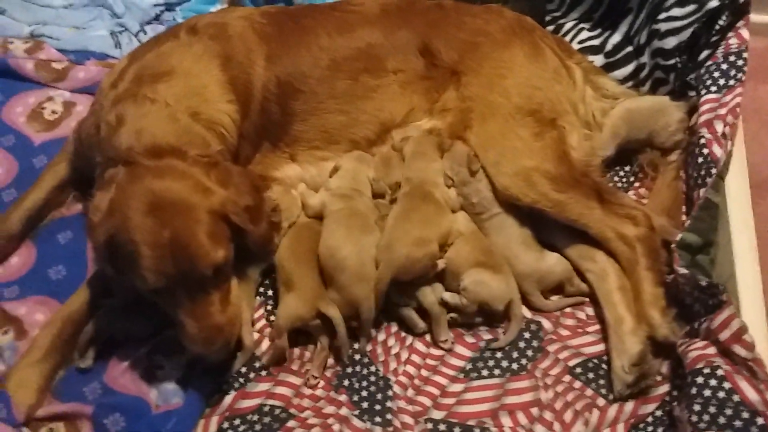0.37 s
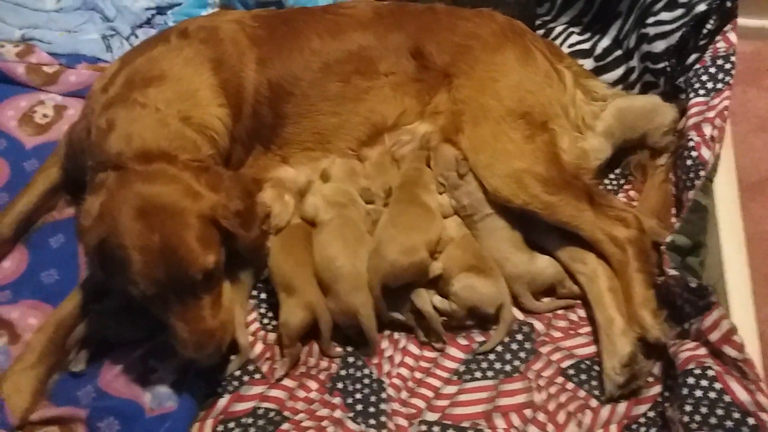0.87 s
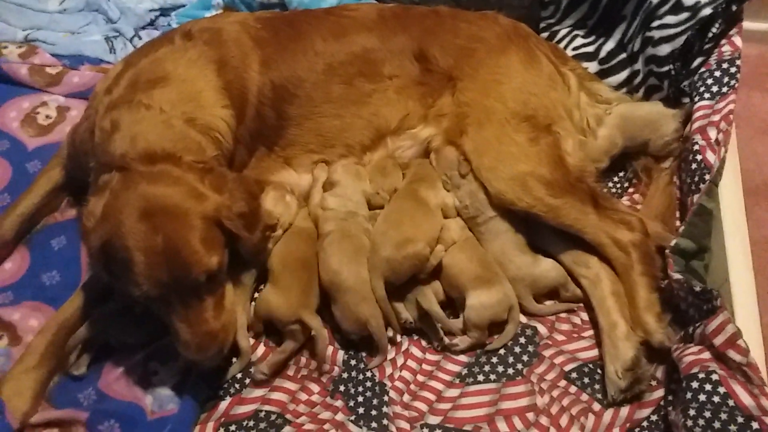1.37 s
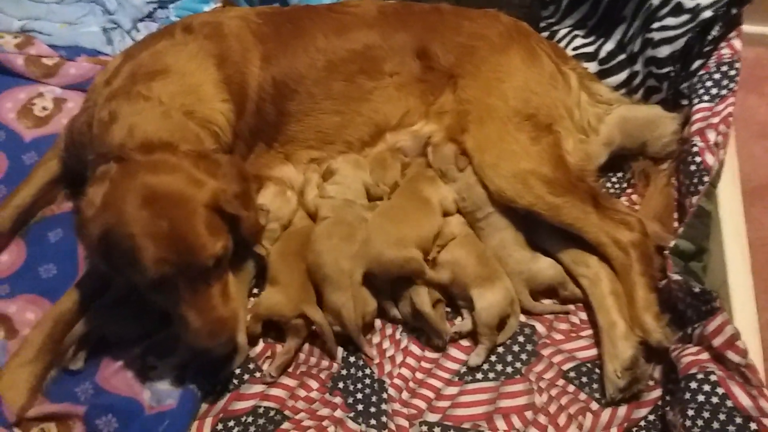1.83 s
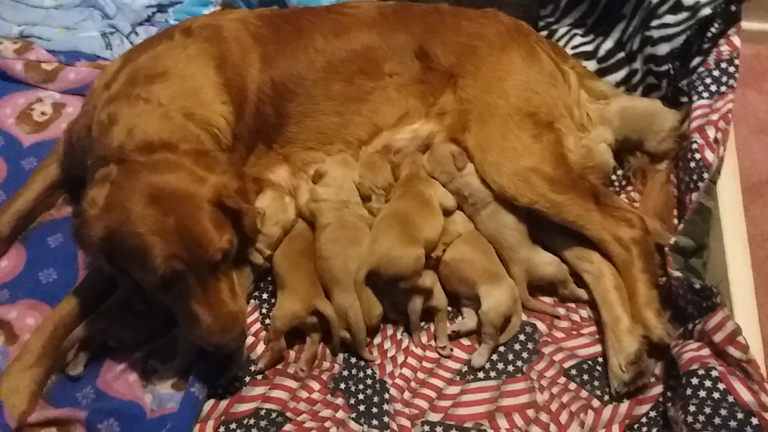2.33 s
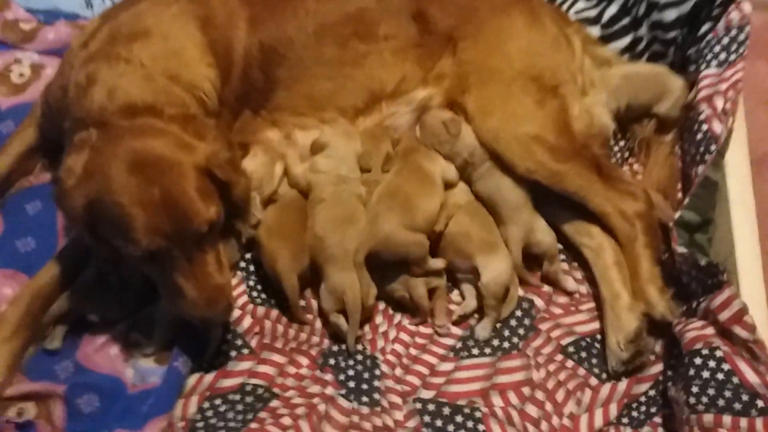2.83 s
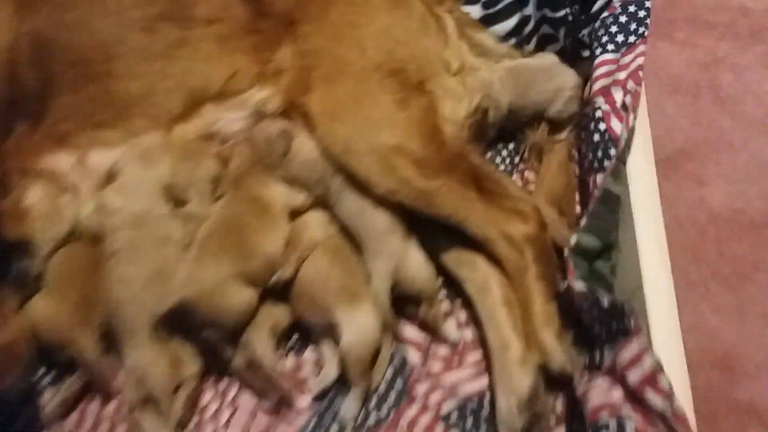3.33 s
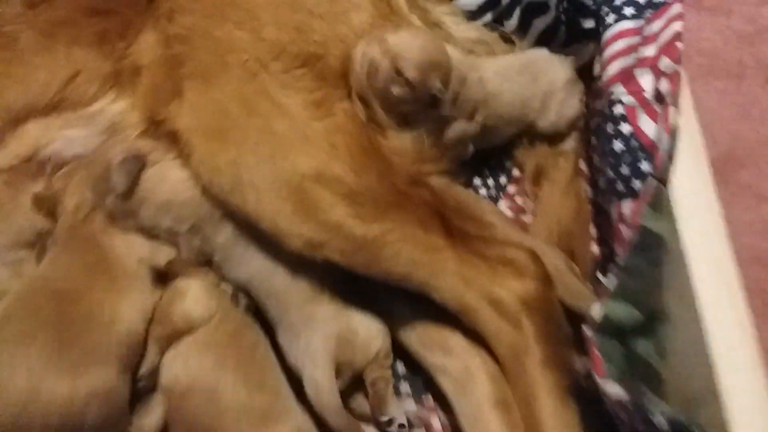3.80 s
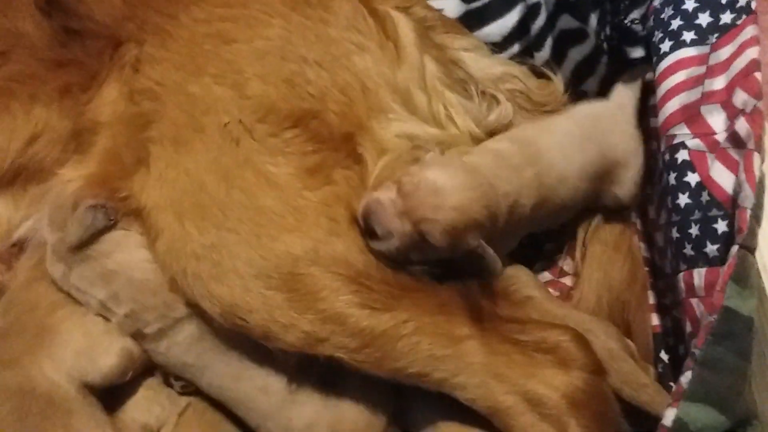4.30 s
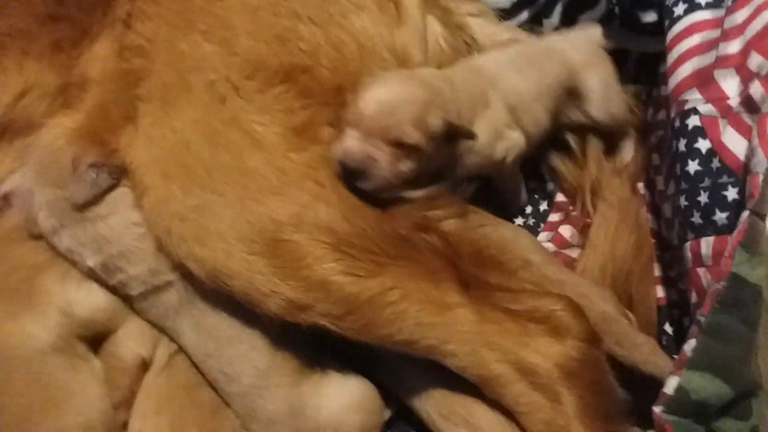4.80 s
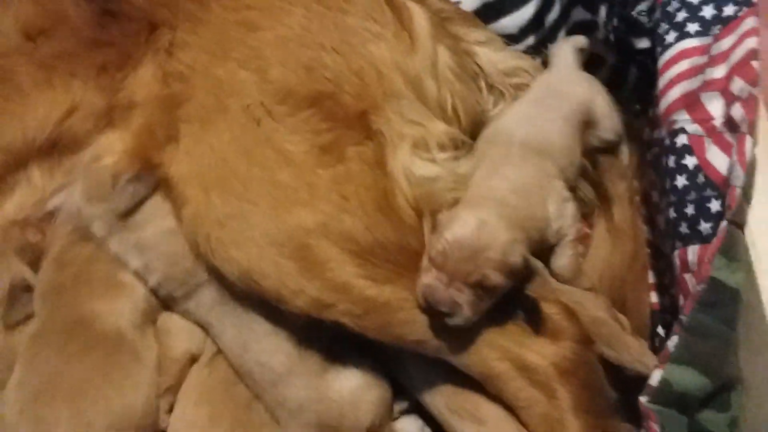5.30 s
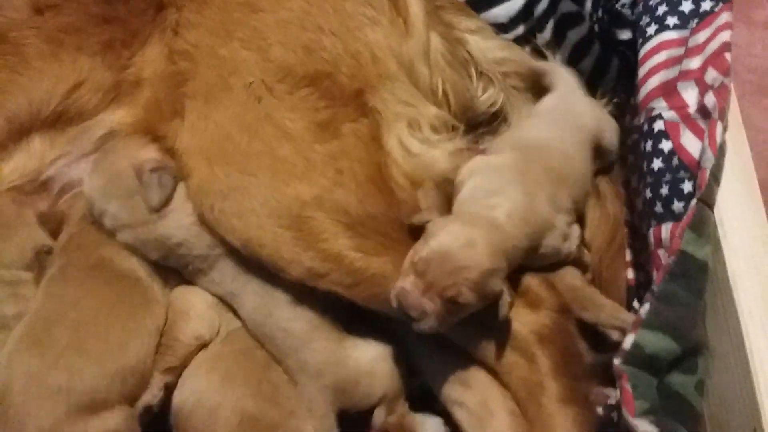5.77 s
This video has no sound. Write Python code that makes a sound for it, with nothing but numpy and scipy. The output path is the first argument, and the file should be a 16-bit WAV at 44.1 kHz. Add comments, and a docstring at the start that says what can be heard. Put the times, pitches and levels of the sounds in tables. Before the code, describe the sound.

A clear puppy whine is already under way at the start, then a longer one leaps up high and slowly sags into a low catch. After small grunts and snuffles comes a short whimper and a loud, sharp squeal, then wet suckling smacks, faint grunts and the mother's soft panting. Close stereo microphone in a quiet, hissy, small home room.

```python
"""A newborn puppy whines at once, over a mother's soft panting and quiet room hiss; squeals follow.
Whines and squeals are stacks of partials shaped by an opening mouth; panting and hiss are shaped noise.
Humming grunts, some of them low catches that end a cry, a handling thump and puffs of snuffling,
faint whimpers and a few wet suckling smacks come in between.
The puppies get a short room tail, and two close microphone ports give the stereo picture."""
import sys
import numpy as np
from scipy import signal
from scipy.fft import rfft, irfft
from scipy.io import wavfile
from scipy.ndimage import uniform_filter1d

SR = 44100
rng = np.random.default_rng(int(sys.argv[2]) if len(sys.argv) > 2 else 0)


def to_wav(s):
    """Save 16-bit WAV."""
    ch = np.atleast_2d(s).T  # columns
    pcm = np.round(np.clip(ch, -1, 1) * 32767)  # PCM
    wavfile.write(sys.argv[1], SR, pcm.astype(np.int16))


def invert_db(x):
    """Field ratio 10**(x/20) for x, a level in decibels (scalar or array-like)."""
    u = np.asarray(x, float) / 20
    return 10 ** u


N = 260190  # length in samples
# noise is built in frames 128 samples apart, each holding 257 frequency bins
FRAMES, BINS = N // 128 + 5, np.fft.rfftfreq(512, 1 / SR)
TIMES = np.arange(FRAMES) * 128 / SR

# Throat and nose colour of the pup that whines, used in the cry voices. Each row: frequency in Hz, gain in dB.
WHINER = [(600, -1.2), (2600, -5.1), (3200, -19), (3900, -4), (4500, -17.5), (5050, -2), (5700, 5),
          (6300, 1), (7100, -7), (8500, 4), (10000, -1.5), (15000, -20)]
# The same for the pup that yelps. Each row: frequency in Hz, gain in dB.
YELPER = [(600, 0.8), (2600, 0), (3100, -0.5), (3500, -14), (4300, -17), (5300, -6.5), (6300, -9.5),
          (8200, 7.5), (9000, 3.5), (9900, -9), (11300, 10.5), (12400, -3.5), (13200, -10.5), (15000, -23)]


def evened(x):
    """Scales to rms 1."""
    return x / np.sqrt(np.mean(x ** 2) + 1e-20)


def read(points, hz):
    """Reads a table on a log-frequency axis."""
    f, value = np.transpose(points)
    return np.interp(np.log(hz + 1), np.log(f + 1), value)


def follow(rows, t):
    """Reads curve columns at times t with rounded corners."""
    s, *columns = np.transpose(rows)
    return [uniform_filter1d(np.interp(t, s, c), size=400, mode="nearest") for c in columns]


def wobble(n, hz):
    """Smooth random curve of rms about 1 that changes up to hz times a second."""
    span = max(round(SR / hz / 2), 2)
    smooth = uniform_filter1d(uniform_filter1d(rng.standard_normal(n + 4 * span), span), span)
    return evened(smooth)[:n]


def add(mix, s, sound, side_db=0):
    """Places a sound in both channels; side_db is how much louder the left one is."""
    part = mix[:, round(s * SR):][:, :len(sound)]
    both = sound * invert_db(np.array([[0.5], [-0.5]]) * side_db)
    part += both[:, :part.shape[1]]


def lagged(hz, lag_s):
    """Phase of a port delay that fades out in the treble."""
    return np.exp(-2j * np.pi * hz * lag_s / (1 + (hz / 3000) ** 4))


def noise(field_db):
    """Stereo noise from a bins x frames level field, partly alike in the two ports."""
    # How alike the ports are. Each row: frequency in Hz, left-right likeness (1 = the same).
    likeness = [(30, 0.33), (120, .7), (420, 0.97), (800, 0.88), (2000, 0.6), (6000, 0.1), (9000, .05)]
    a, b, c, d = rng.standard_normal((FRAMES, 257, 4)).T
    same = np.clip(read(likeness, BINS), -1, 1)[:, None]
    left = a + 1j * b
    right = same * left + np.sqrt(1 - same ** 2) * (c + 1j * d)
    # a negative lag in seconds: the noise reaches the left port earlier
    z = np.array([left * lagged(BINS, -0.00021)[:, None], right])
    return signal.istft(z * invert_db(field_db), nperseg=512, noverlap=384)[1][:, :N]


def cry(rows, voice, jitter=0.006, shimmer_db=1.2):
    """Clear vocal folds through a mouth that opens and shuts; slides in pitch turn the voice breathy."""
    shut_hz, open_hz = 900, 2700  # mouth resonance when shut and when wide open
    mouth_q = 1.96  # sharpness of the mouth resonance
    glide_hoarse_db = 1.5  # more breath noise for each octave a second that the pitch slides
    head, side_db, fall_db, breath_db, muffle_db = voice
    t = np.arange(rows[0][0], rows[-1][0], 1 / SR)
    hz, level_db, opening = follow(rows, t)
    octaves_a_second = abs(np.gradient(np.log2(hz))) * SR
    hoarse = invert_db(breath_db + glide_hoarse_db * uniform_filter1d(octaves_a_second, size=800))
    turns = np.cumsum(hz * (1 + jitter * wobble(len(t), 40))) / SR

    order = np.arange(1., 24)[:, None]
    mouth_hz = shut_hz * (open_hz / shut_hz) ** opening
    near = order * hz / mouth_hz
    colour_db = read(head, order * hz) - fall_db * np.log2(order)
    colour_db -= muffle_db * (1 - opening) * (order > 4)
    partials = invert_db(colour_db) / ((1 - near ** 2) ** 2 + (near / mouth_q) ** 2)
    partials *= invert_db(level_db) / np.linalg.norm(partials, axis=0)

    out = 0
    for k, size in enumerate(partials, 1):
        # higher partials are more blurred and less even
        shimmer = invert_db(shimmer_db * k ** 0.65 * wobble(len(t), 42))
        breath = hoarse * k ** 0.95 * wobble(len(t), 400)
        wave = np.sin(2 * np.pi * k * turns + k * k) * (k * hz < 15500)
        out = out + np.sqrt(2) * size * (shimmer + breath) * wave
    # fades in and out, but a cry at time zero starts at full level
    fade_in = (t - t[0]) * 300 + (t[0] == 0)
    edge = np.clip(np.minimum(fade_in, (t[-1] - t) * 200), 0, 1)
    return t[0], out * edge, side_db


def panting():
    """Turbulent air through an open mouth: each pant swells and fades over a softer airflow."""
    # Colour of the air. Each row: frequency in Hz, relative level in dB per Hz.
    pant_colour = [(60, -14), (150, 5), (420, 11), (1000, 7.5), (2000, 13.5), (2800, 6.5), (4500, -2),
                   (6000, -9.5), (7500, -14), (9500, -24.5), (11500, -21.5), (13000, -16.5), (15500, -21.5)]
    # The mother's pants. Each row: start in seconds, length in seconds, airflow in dB.
    pants = [(0.012, 0.075, -64.5), (0.162, 0.06, -66), (0.294, 0.054, -76), (1.321, 0.082, -73),
             (1.535, 0.04, -69), (1.655, .14, -87), (1.914, 0.1, -74), (2.085, 0.18, -79),
             (2.493, .15, -66), (2.893, 0.12, -65), (3.731, 0.16, -63.5), (4.072, 0.11, -67),
             (4.345, 0.13, -63), (4.682, 0.16, -74.5), (4.855, 0.037, -75.5), (4.918, 0.11, -70),
             (5.174, 0.054, -73), (5.217, 0.15, -71), (5.521, 0.053, -71)]
    # Soft airflow under and between the pants. Each row: time in seconds, airflow in dB.
    soft_airflow = [(0, -76), (.4, -76.5), (.47, -89), (.74, -90.5), (.9, -78), (1.7, -83), (2.82, -86),
                    (3.05, -78.5), (4.3, -81), (4.6, -85), (5.9, -85)]
    # treble lift in dB per octave at -65 dB of airflow, and its growth per dB
    bright_db, brighter = 5, 0.43
    # airflow is the level of the mid treble
    band = (BINS > 3500) & (BINS < 7500)
    band_power = 2 * np.sum(invert_db(read(pant_colour, BINS[band])) ** 2)
    colour_db = read(pant_colour, BINS) - 10 * np.log10(band_power)
    octave = np.log2((BINS + 100) / 5000)
    # amp of doubled dB gives power; the soft airflow loses 1.1 dB per octave
    soft_db = np.interp(TIMES, *np.transpose(soft_airflow))
    power = np.outer(invert_db(2 * -1.1 * octave), invert_db(2 * soft_db))
    for s, length, flow_db in pants:
        tilt_db = bright_db + brighter * (flow_db + 65)
        sizzle_db = 0.9 * (flow_db + 58.5) * (BINS > 8500)  # softer pants lose more of the top treble
        u = np.clip((TIMES - s) / length, 0, 1)
        power += np.outer(invert_db(2 * (flow_db + tilt_db * octave + sizzle_db)), np.sin(np.pi * u) ** 1.3)
    flicker_db = 2.4 * rng.standard_normal(FRAMES)
    # the last term makes up for the frame window
    return noise(colour_db[:, None] + 10 * np.log10(power) + flicker_db + 7.5)


def hiss():
    """Room tone and microphone self-noise, with drifting patches and faint narrow midrange streaks."""
    # Colour of the hiss. Each row: frequency in Hz, relative level in dB per Hz.
    hiss_colour = [(25, -11), (38, -9), (55, 4.5), (120, 10.5), (250, -10.5), (420, -10.5), (1000, -6.5),
                   (1700, -5.5), (2800, -13.5), (3500, -19.5), (6000, -18.5), (7600, -13), (8300, -26),
                   (10000, -24), (13000, -21.5), (14600, -20), (15700, -15.5)]
    hiss_db = -65.5  # overall rms level
    a, b = rng.standard_normal((FRAMES, 257, 2)).T
    patches = evened(uniform_filter1d(uniform_filter1d(a, 8, 0), 30, 1))
    middle = np.exp(-np.log2((BINS[:, None] + 1) / 1000) ** 2 / 5.6)
    streaks = evened(uniform_filter1d(b, 70, 1)) * middle
    field_db = read(hiss_colour, BINS)[:, None] + 1.0 * patches + 1.7 * streaks
    return invert_db(hiss_db) * evened(noise(field_db))


def puff(s, length, db, hz, octaves):
    """A lumpy burst of noise coloured by one broad resonance: a snuffle, or a thump when very low."""
    t = np.arange(SR // 5) / SR
    f = np.fft.rfftfreq(len(t), 1 / SR)
    resonance = np.exp(-(np.log2((f + 1) / hz) / octaves) ** 2)
    air = irfft(rfft(rng.standard_normal(len(t))) * resonance, len(t))
    swell = np.sin(np.pi * np.minimum(t / length, 1) ** 0.49)
    return s, invert_db(db + 1.1 * wobble(len(t), 90)) * evened(air) * swell


def grunt(s, hum_db, hz, t60, overtone_db):
    """The mouth lets overtones out for an instant, then shuts on a wavering hum that sags and dies."""
    t = np.arange(SR // 3) / SR
    turns = np.cumsum(hz * (1 - 0.2 * t + 0.03 * wobble(len(t), 80))) / SR
    hum_level = invert_db(hum_db - 60 * t / t60 + 4.16 * wobble(len(t), 72))
    hum = hum_level * np.minimum(t * 220, 1) * np.sin(2 * np.pi * turns)
    # mouth resonance is 843 Hz at -55 dB of overtones; louder means wider open, 4 Hz per dB
    mouth_hz = 843 + 4 * (overtone_db + 55)
    open_db = overtone_db - 400 * (t / 0.11) ** 2
    overtones = 0
    for k in range(2, 7):
        off_mouth_db = 15.0 * np.log2(k * hz / mouth_hz) ** 2
        level = invert_db(open_db - off_mouth_db + 3.4 * wobble(len(t), 75))
        overtones = overtones + level * np.sin(2 * np.pi * k * turns)
    return s, hum + overtones * np.minimum(t * 600, 1)


def whimper(s, length, hz, db, third_db):
    """A soft, husky note of three partials with unsteady pitch and levels."""
    n = round(length * SR)
    turns = np.cumsum(hz * (1 + 0.026 * wobble(n, 66))) / SR
    note = 0
    for k, partial_db in enumerate([0, -16, third_db], 1):
        note = note + invert_db(partial_db + 3.7 * wobble(n, 90)) * np.sin(2 * np.pi * k * turns)
    return s, invert_db(db) * note * signal.windows.tukey(n, 0.4)


def smack(s, db, hz):
    """A wet pop: about two cycles of mouth ring and a tick, a short rattle and a second smaller pop."""
    t = np.arange(600) / SR
    since_peak = t - 0.0006
    pop = np.exp(-(since_peak / 0.00036) ** 2) * np.cos(2 * np.pi * hz * since_peak)
    # the lips part with a tick, stronger in hard smacks
    pop += 0.445 * invert_db(db + 24) * np.exp(-(since_peak / 0.00005) ** 2)
    rattle = 0.84 * np.exp(-t / 0.0025) * uniform_filter1d(rng.standard_normal(600), size=4)
    second_pop = np.roll(pop, 170)
    extra = 0.39 * invert_db((db + 21.5) / 2)  # hard smacks have a larger share of both
    return s, invert_db(db) * (pop + extra * (rattle + second_pop))


def room(x):
    """Sparse taps of random sign, one in every 20 samples, each band dying at its own speed."""
    # How long the room rings. Each row: frequency in Hz, time to fall by 60 dB in seconds.
    ring_times = [(300, 0.6), (1000, 0.35), (2500, 0.33), (5000, 0.47), (10000, 0.23)]
    taps = np.zeros((2, SR // 2))
    at = np.arange(200, SR // 2 - 20, 20) + rng.integers(0, 20, (2, (SR // 2 - 201) // 20))
    np.put_along_axis(taps, at, rng.choice([-1., 1.], at.shape), 1)
    hz, t, z = signal.stft(taps, SR, nperseg=256)
    decay = invert_db(-60 * t / read(ring_times, hz)[:, None])
    tail = signal.istft(z * decay, SR, nperseg=256)[1]
    tail = tail / np.linalg.norm(tail[0])
    return signal.fftconvolve(x.mean(0)[None], tail, axes=1)[:, :N]


def scene():
    """Puppies and a handling thump with their room tail, over panting and hiss."""
    # One table a cry. Each row: time in seconds, pitch in Hz, rms level in dB, mouth opening from 0 to 1.
    cries = [
        [(0.0, 1090, -32.5, 0.44), (0.052, 1065, -34.5, 0.43), (0.084, 1122, -35.5, 0.52),
         (0.192, 1252, -33.5, 0.4), (0.236, 1179, -33, 0.45), (0.304, 1217, -32.5, .37),
         (0.364, 1165, -35.5, 0.47), (0.412, 1074, -37, 0.42)],
        [(0.75, 952, -39.5, 0.43), (0.796, 1238, -28, 0.54), (0.828, 1326, -31, .85), (0.848, 1648, -35, 1),
         (0.864, 1663, -30.5, 0.98), (0.896, 1695, -40.5, 1), (0.924, 1622, -32, 0.88),
         (0.964, 1615, -33.5, 0.76), (1.012, 1674, -40.5, 0.74), (1.04, 1609, -39, 0.76),
         (1.088, 1641, -42, 0.14), (1.156, 1562, -42, 0.68), (1.256, 1528, -42, 0.67),
         (1.332, 1477, -36.5, 0.65), (1.412, 1487, -33.5, 0.67), (1.444, 1392, -37.5, 0.64),
         (1.604, 1417, -35.7, 0.6), (1.68, 1294, -36, 0.49), (1.76, 1262, -33, 0.46), (1.792, 1098, -34, 0.39),
         (1.828, 849, -33, 0.38), (1.88, 692, -38.5, 0.42)],
        [(2.855, 618, -44.5, 0.02), (2.877, 643, -36.5, 0), (2.921, 852, -44.5, .36), (2.946, 920, -36.5, 0.34),
         (2.954, 781, -38.5, .15), (2.982, 741, -37.5, 0), (3.037, 795, -56, .03)],
        [(3.237, 840.3, -43, 0.38), (3.265, 852, -28, .8), (3.295, 1035, -21.5, 0.73),
         (3.315, 1042, -17.5, 0.75), (3.334, 1018, -16.5, 0.79), (3.351, 959, -18.5, 0.88),
         (3.371, 856, -19.5, 0.79), (3.415, 703.5, -24.5, .63), (3.439, 594.6, -38, 0.07),
         (3.459, 619, -49.5, 0.16)],
    ]
    # The voice behind each cry. Each row: colour of the pup, left minus right in dB,
    # fall of the partials in dB per octave (negative = rise), breath noise in dB,
    # loss above partial 4 with the mouth shut in dB.
    cry_voices = [(WHINER, -0.86, 0.12, -39, 16), (WHINER, 0.43, -1.4, -31.5, 24),
                  (YELPER, -0.44, -5.5, -25.5, 0.1), (YELPER, 2.5, -8, -33, 0.1)]
    # Puffs of snuffling; the first row is a low handling thump. Each row: start in seconds,
    # length in seconds, level in dB, centre in Hz, width in octaves.
    puffs = [(0.361, 0.052, -57, 98, 0.42), (1.501, 0.12, -58, 362, 1.2), (1.656, 0.1, -58.5, 514.5, 1.6),
             (2.421, 0.11, -50, 1030, 1.02), (2.496, 0.25, -56.5, 249, 2.24), (2.67, 0.11, -59, 467, 1.33),
             (3.791, 0.13, -52, 430, 2.1), (4.446, 0.08, -59.5, 487, 0.81), (4.758, 0.06, -62, 1030, 0.45),
             (5.063, 0.097, -59, 476, 0.32)]
    # Short grunts, and the low catches that end three of the cries. Each row: start in seconds,
    # hum level in dB, starting pitch in Hz, time for the hum to fall by 60 dB in seconds,
    # overtone level in dB.
    grunts_and_catches = [(.411, -59.5, 412, 0.088, -37), (1.185, -48, 577, 0.069, -90),
                          (1.306, -51, 539, 0.13, -62), (1.508, -54, 580, .15, -80),
                          (1.674, -57.5, 300, 0.21, -60), (1.877, -24.5, 623, 0.085, -29),
                          (2.158, -42, 483.7, 0.26, -43.5), (2.452, -49.5, 480, 0.23, -47),
                          (2.699, -61, 354, .15, -58), (3.43, -37, 591, 0.14, -53),
                          (3.722, -43, 433, 0.14, -43.5), (3.797, -57.5, 401, 0.27, -59),
                          (4.118, -52, 422, 0.14, -78), (4.209, -49.5, 538, 0.033, -74),
                          (4.447, -58, 331, 0.15, -61), (5.514, -42, 308, 0.12, -51.5),
                          (5.666, -44, 413.6, 0.2, -56)]
    # Faint whimpers. Each row: start in seconds, length in seconds, pitch in Hz, level in dB,
    # third partial in dB relative to the first.
    whimpers = [(2.236, 0.36, 410, -63, 0), (2.62, 0.069, 410, -69, 7), (3.094, 0.081, 638, -63, 3),
                (5.018, 0.13, 321, -58.5, -39.5), (5.305, 0.248, 451, -66.5, 0.5),
                (2.43, 0.096, 451, -51.5, -20), (5.8, 0.11, 2150, -66.5, -34)]
    # Suckling smacks. Each row: start in seconds, level in dB, centre in Hz.
    smacks = [(3.236, -35.5, 1920), (3.845, -29.5, 2400), (3.8777, -23, 2335), (3.995, -47.5, 1220),
              (4.209, -46, 796), (4.6735, -48.5, 1696)]

    pups = np.zeros((2, N))
    for rows, voice in zip(cries, cry_voices):
        add(pups, *cry(rows, voice))
    for source, rows in (puff, puffs), (grunt, grunts_and_catches), (whimper, whimpers), (smack, smacks):
        for row in rows:
            add(pups, *source(*row))
    tail = invert_db(-11.5) * room(pups)
    # the direct sound of these layers reaches the left port 0.1 ms later
    delay = lagged(np.fft.rfftfreq(2 * N, 1 / SR), 0.0001)
    pups[0] = irfft(rfft(pups[0], 2 * N) * delay)[:N]
    return pups + tail + panting() + hiss()


def top_cut(x):
    """Nothing passes above the cut-off."""
    return signal.sosfilt(signal.butter(12, 15760, fs=SR, output="sos"), x)


def record(dry):
    """Two microphone ports: the left one is brighter and both lose the deep bass."""
    # How the ports differ. Each row: frequency in Hz, left minus right in dB.
    port_difference = [(40, -1), (140, 2), (600, 2), (1200, 4), (2600, 13), (4500, 11.5), (7500, 3.5),
                       (9500, -4.5), (13000, 3.5), (15500, 9.5)]
    hz = np.fft.rfftfreq(2 * N, 1 / SR)
    left = invert_db(read(port_difference, hz))
    bass_cut = 1 / np.sqrt(1 + (53 / (hz + 1)) ** 8)
    port_gains = np.array([2 * left, 2 + 0 * left]) / (1 + left)
    ports = irfft(rfft(dry, 2 * N) * bass_cut * port_gains)[:, :N]
    return top_cut(ports)


dry = scene()
out = record(dry)
to_wav(out)
```